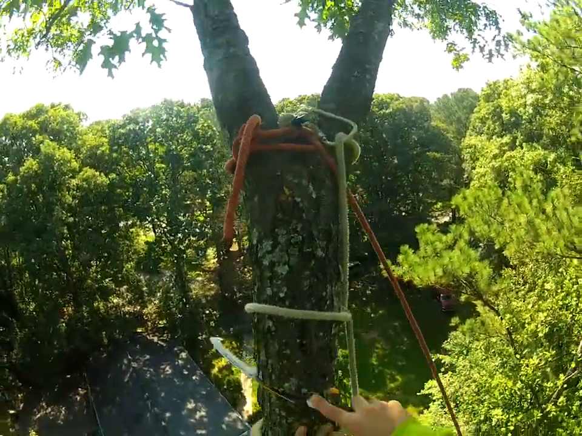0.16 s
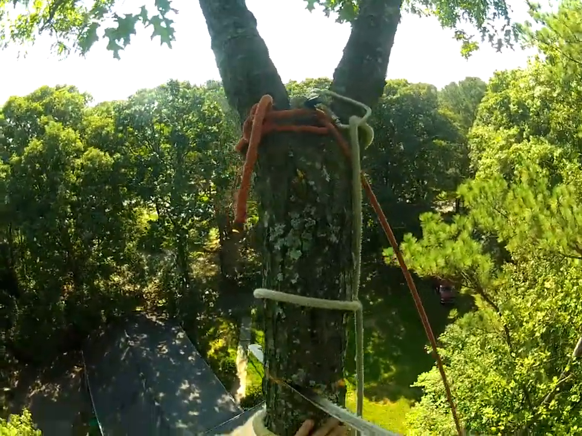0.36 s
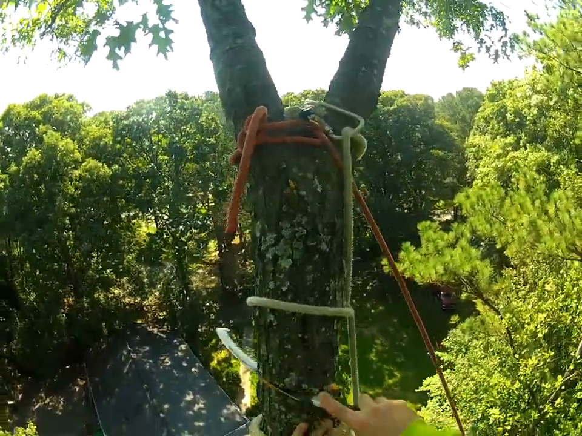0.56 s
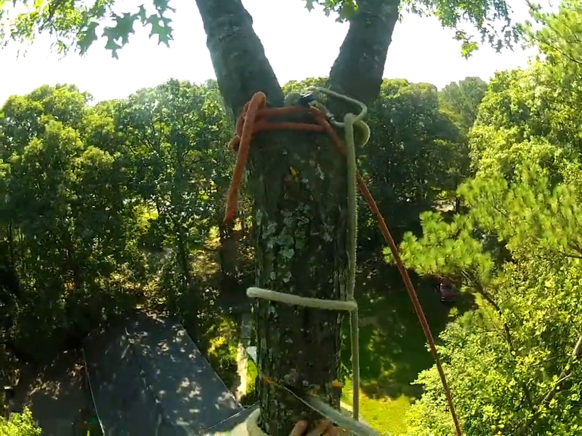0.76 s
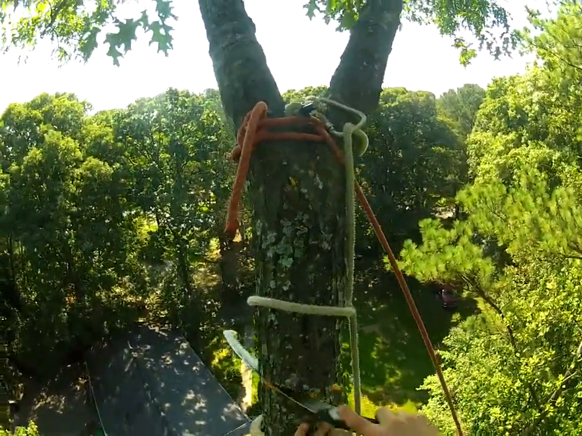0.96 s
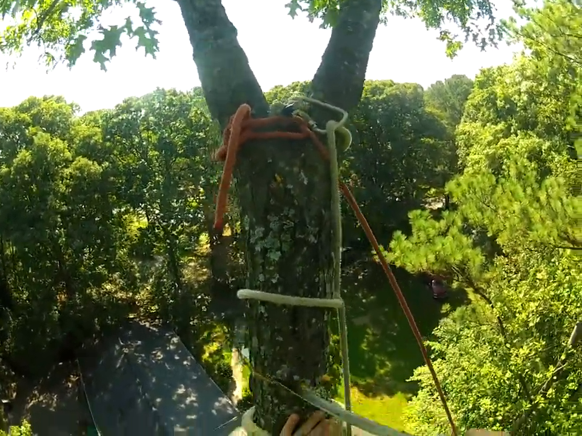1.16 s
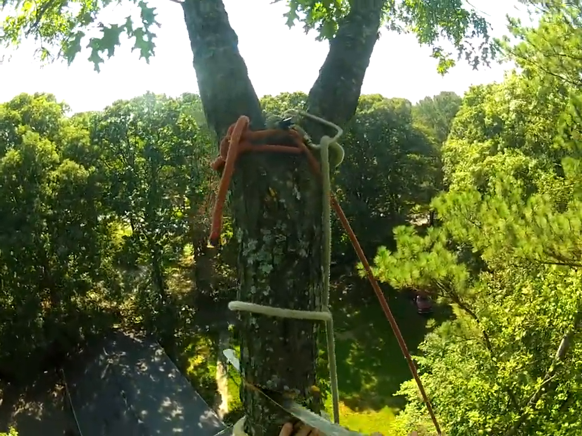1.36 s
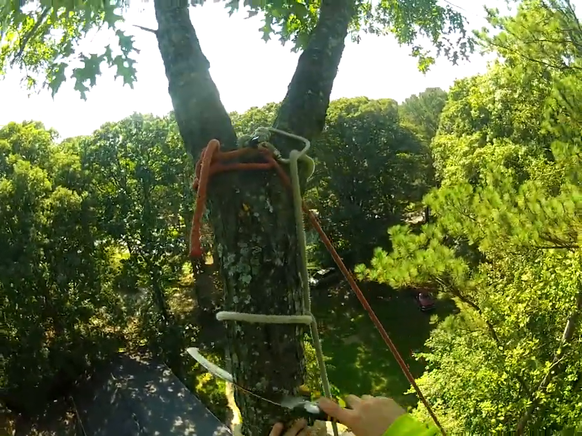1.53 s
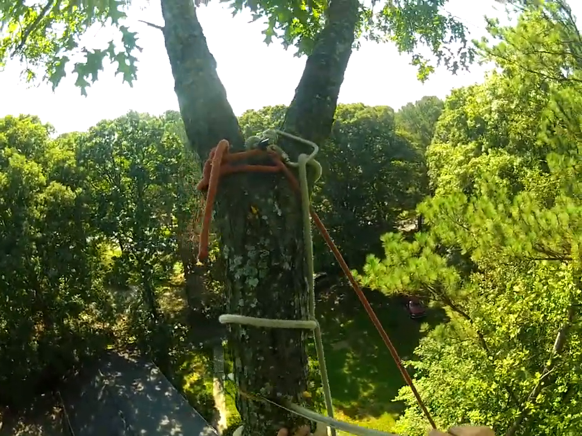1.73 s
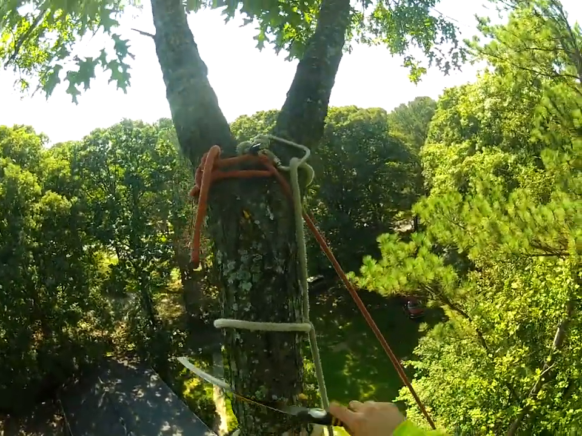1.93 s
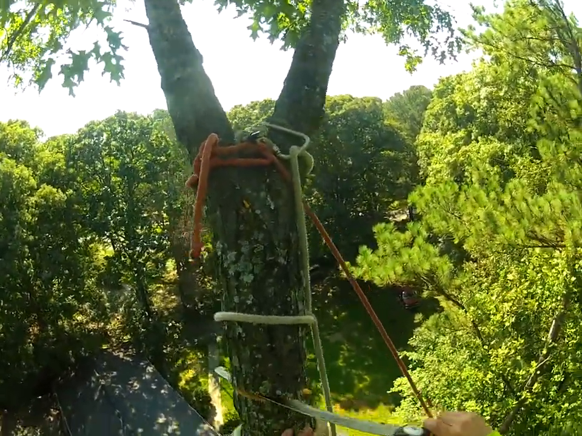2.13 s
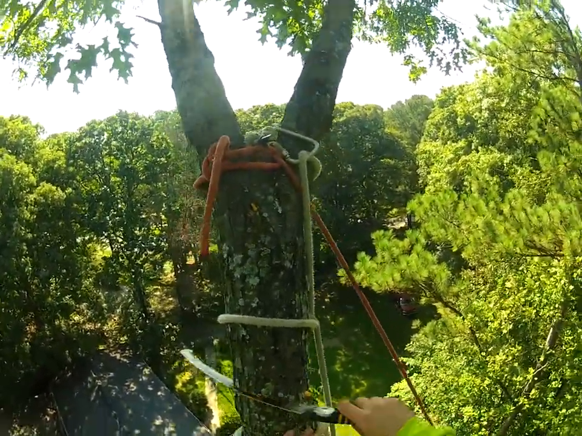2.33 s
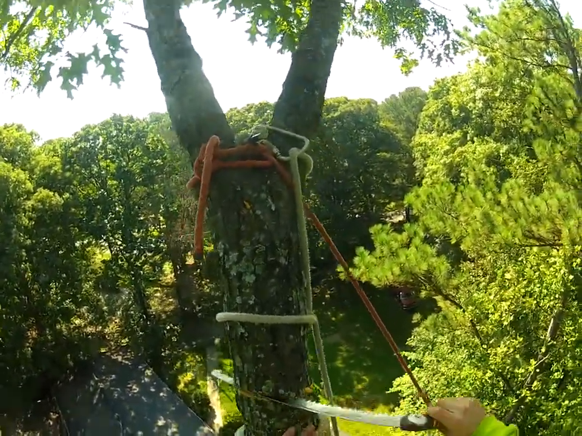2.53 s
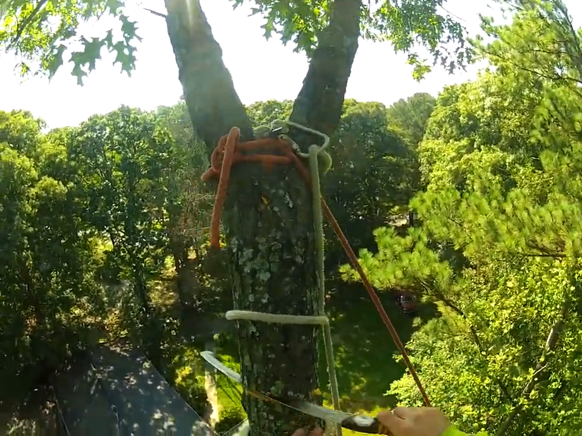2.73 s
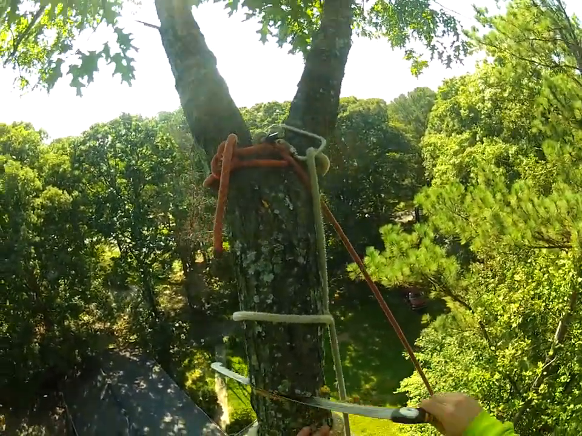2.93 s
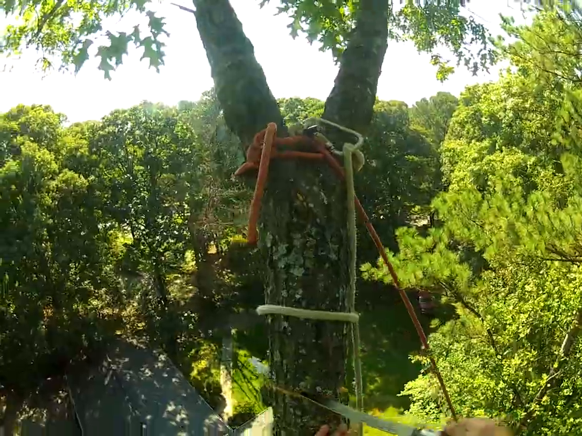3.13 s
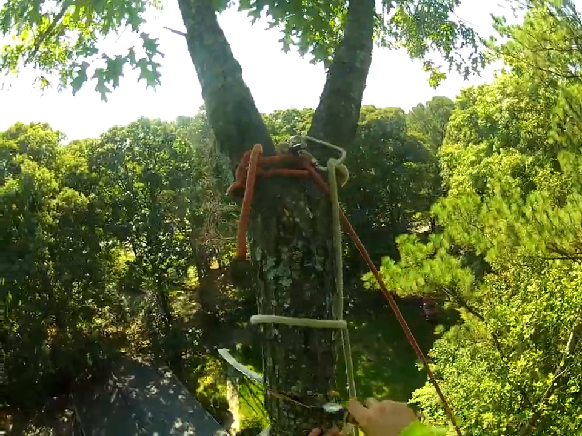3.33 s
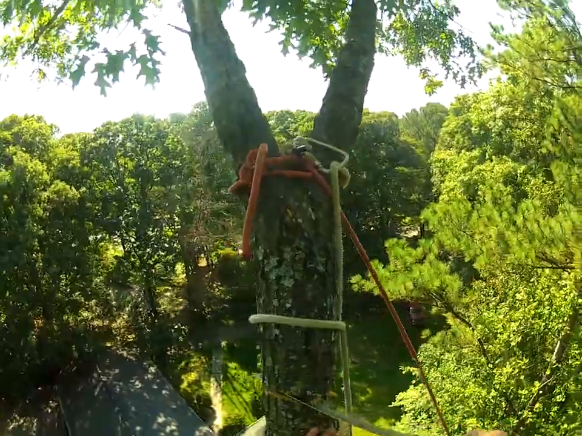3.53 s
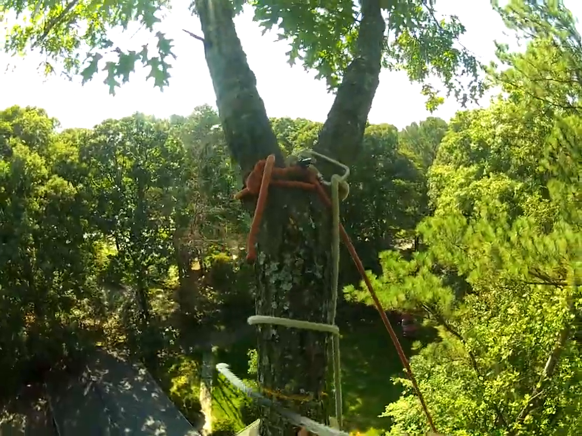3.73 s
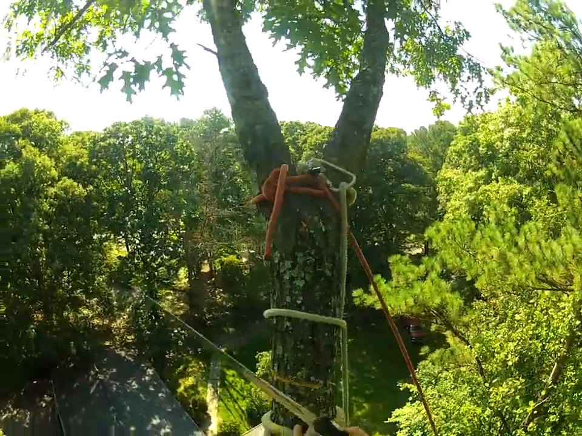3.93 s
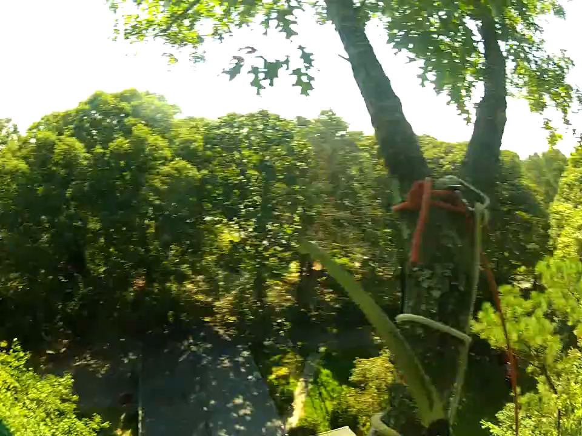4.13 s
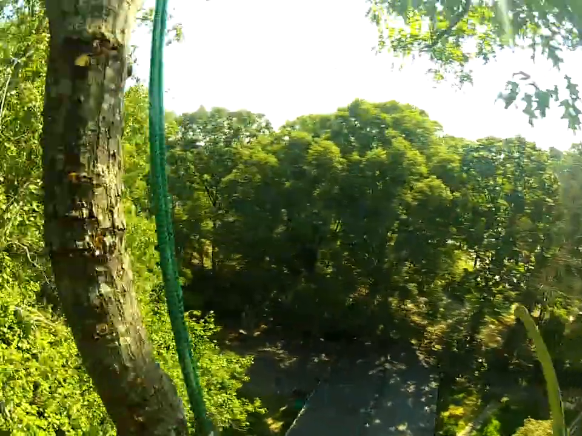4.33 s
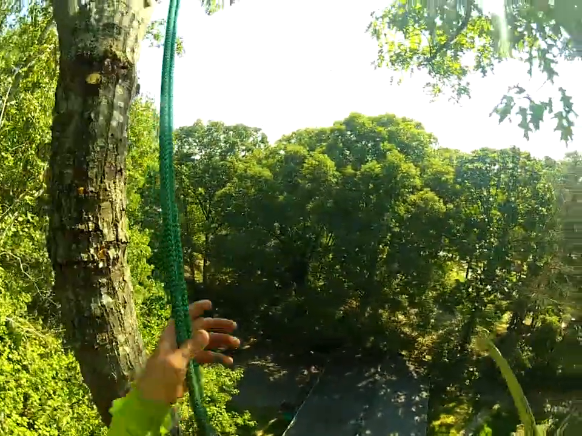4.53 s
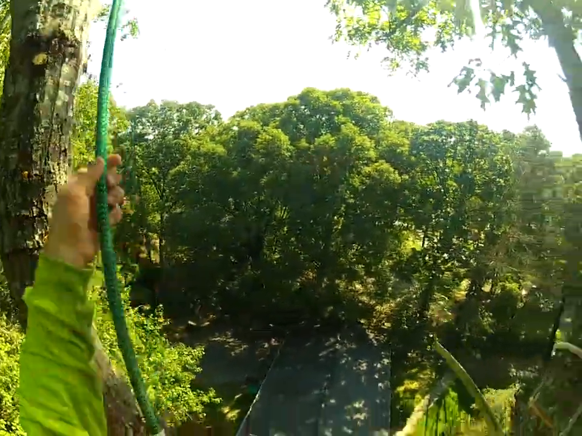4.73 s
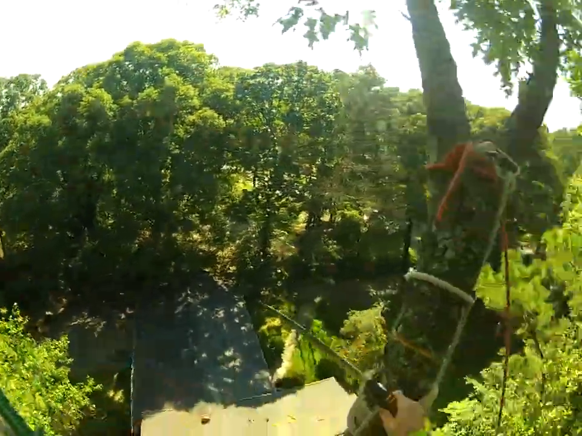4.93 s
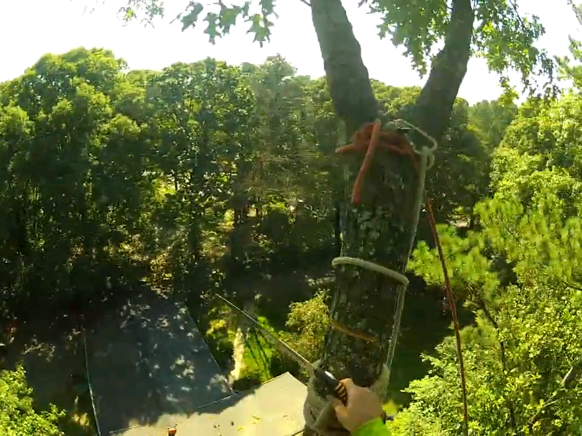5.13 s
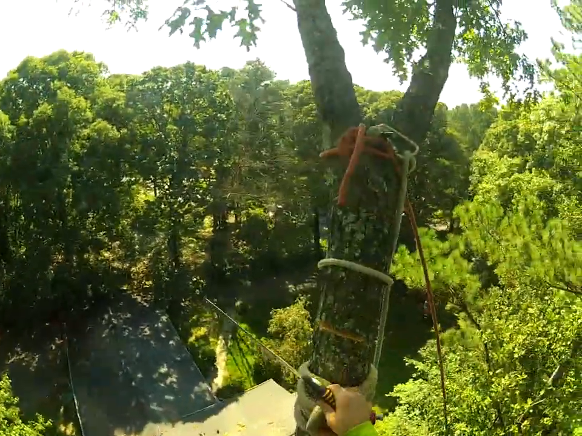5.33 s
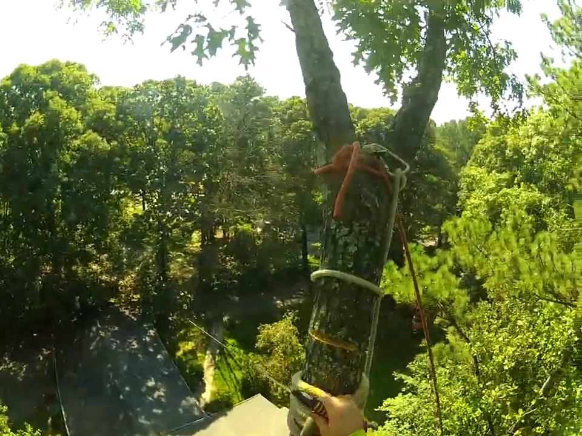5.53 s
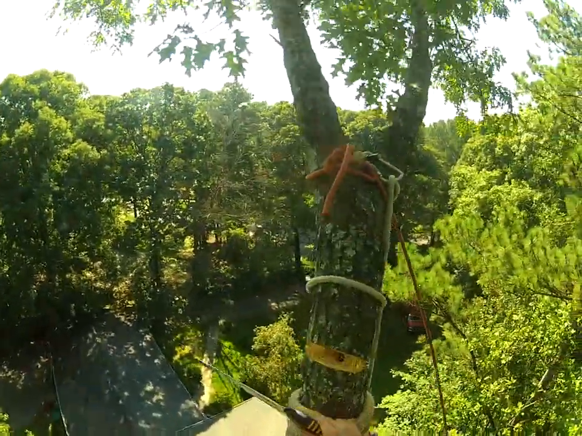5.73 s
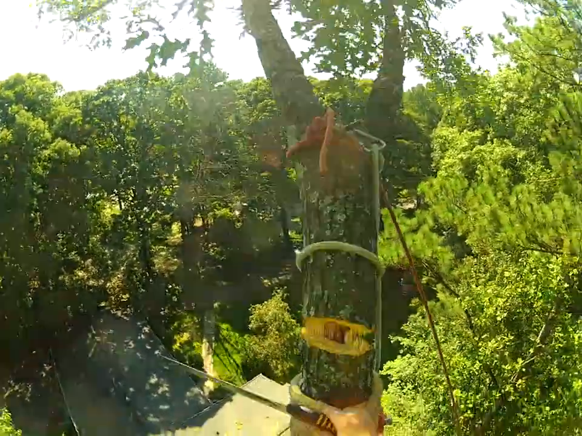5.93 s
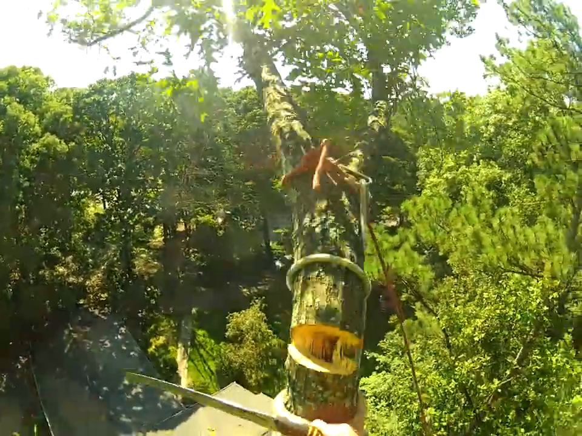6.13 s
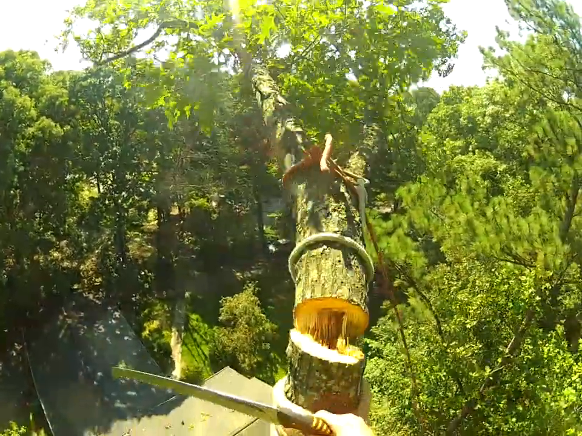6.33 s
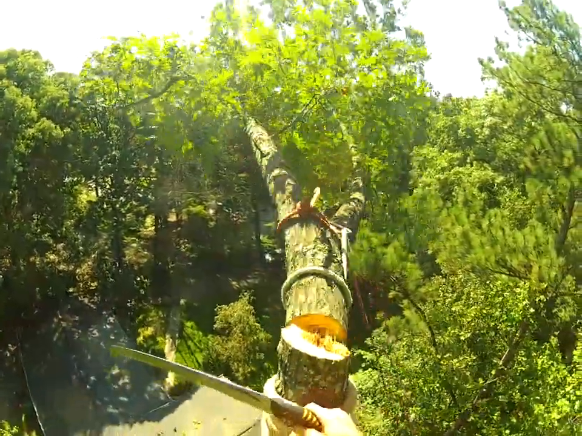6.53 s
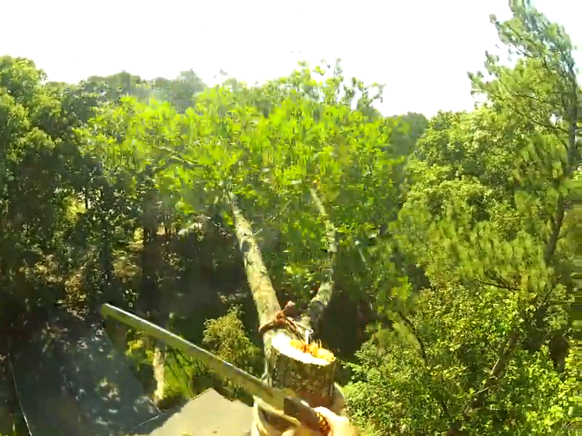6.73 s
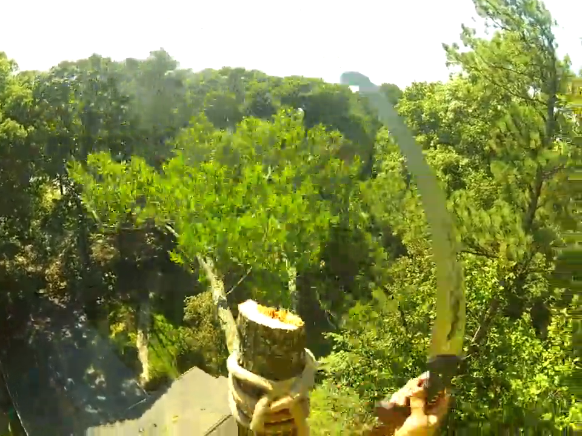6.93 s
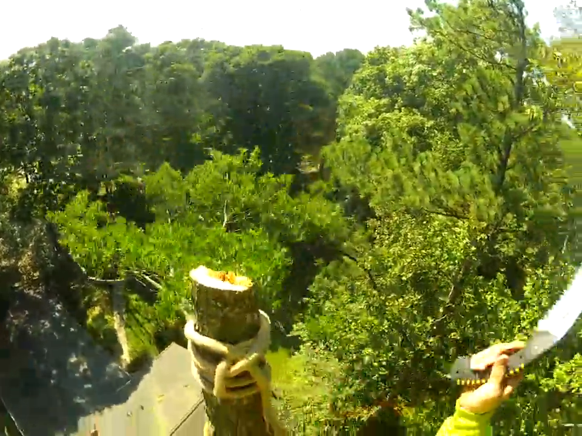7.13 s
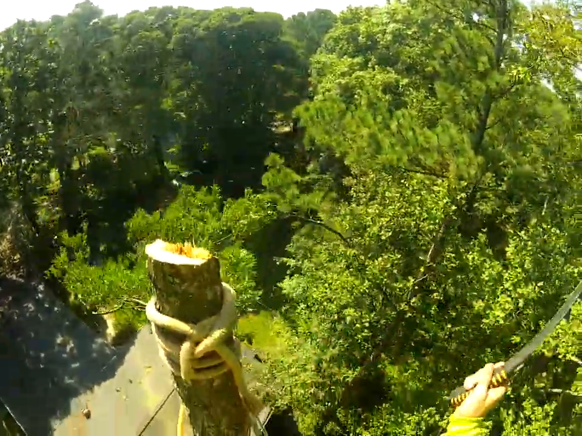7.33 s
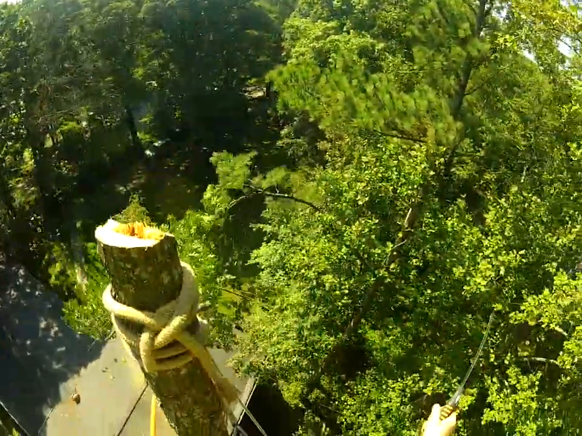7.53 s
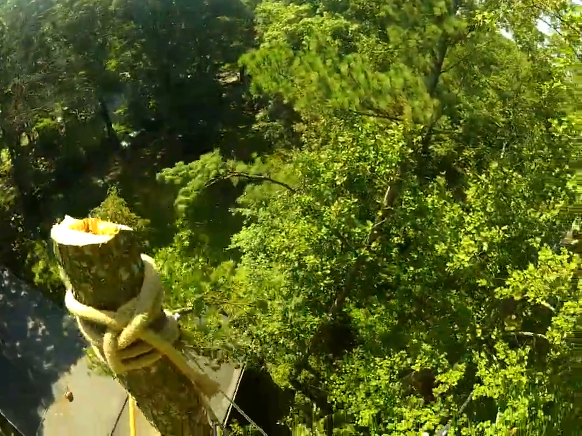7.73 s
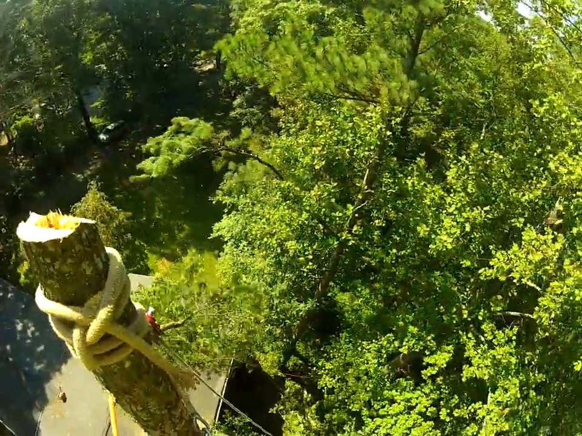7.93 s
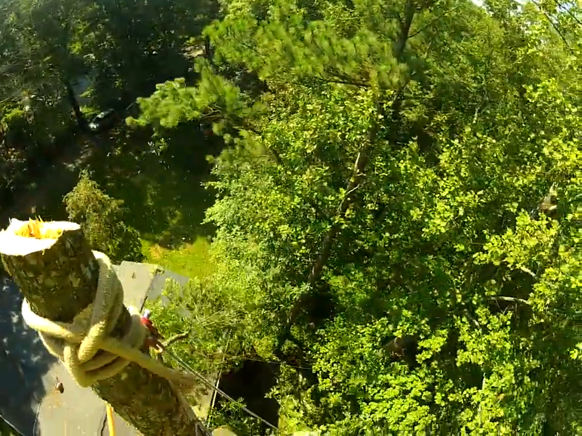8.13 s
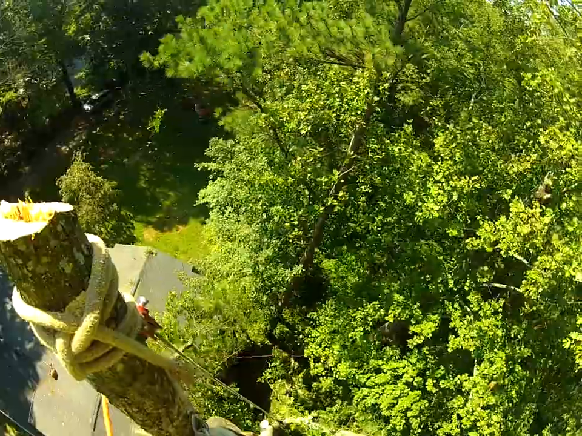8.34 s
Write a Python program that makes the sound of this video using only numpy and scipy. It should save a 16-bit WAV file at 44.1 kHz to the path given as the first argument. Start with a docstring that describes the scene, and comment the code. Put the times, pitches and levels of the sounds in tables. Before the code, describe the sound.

Outdoors high in a tree, a boxy, muffled helmet microphone in a sealed plastic case. Quick back-and-forth hand saw strokes rasp faintly under loud hollow clacks, pad thuds and small rattles as each stroke jolts the case. The knocking thins and stops, wood ticks and snaps sparsely, then cracks crowd into a loud splintering tear. The top falls with a grainy, flickering rustle of leaves and a few last snaps, then a low steady murmur.

```python
"""High in a tree a climber saws through a stem, heard by a helmet camera in a sealed plastic case.
Strokes jolt the camera against the stops of its mount: struck shell modes, pad thuds, damped nods.
The muffled saw is tooth clicks and noise through the resonances of the case, over a steady floor.
The hinge cracks and tears as noise bursts; the top falls, its leaves a grainy, flickering rush."""
import sys
import numpy as np
from scipy import signal
from scipy.fft import rfft, irfft
from scipy.io import wavfile
from scipy.ndimage import uniform_filter1d

SR = 44100
rng = np.random.default_rng(int(sys.argv[2]) if len(sys.argv) > 2 else 0)


def to_wav(s):
    """Save 16-bit WAV."""
    ch = np.atleast_2d(s).T  # columns
    pcm = np.round(np.clip(ch, -1, 1) * 32767)  # PCM
    wavfile.write(sys.argv[1], SR, pcm.astype(np.int16))


N = 373527
STEP = 32   # samples between control points


def amp(db):
    """dB to gain."""
    return 10 ** (np.asarray(db) / 20)


def rms_one(x):
    """Scale to rms 1."""
    return x / np.sqrt(np.mean(x ** 2) + 1e-20)


def control_times():
    """Times of the control points, in seconds."""
    return np.arange(0, N, STEP) / SR


def per_sample(control):
    """Hold each control point for STEP samples."""
    return np.repeat(control, STEP)[:N]


def in_time(rows):
    """Level and any tilt curve at the control points; -150 dB outside the table."""
    time_s, level_db, *others = np.transpose(rows)
    t = control_times()
    level = np.interp(t, time_s, level_db, left=-150, right=-150)
    return [level] + [np.interp(t, time_s, column) for column in others]


def tilted(level_db, tilt_db_per_octave, hz):
    """Gain at hz for a slope that turns about 1.5 kHz."""
    return amp(level_db + tilt_db_per_octave * np.log2(hz / 1500))


def flicker(rate_hz):
    """Slow random curve at the control points: twice-smoothed noise, rms 1."""
    r = np.exp(-2 * np.pi * rate_hz * STEP / SR)
    return rms_one(signal.lfilter([1], [1, -2 * r, r * r], rng.standard_normal(N // STEP + 1)))


def grains(per_s, spread_db):
    """Random clicks of uneven size and sign; rms 1."""
    signs = rng.choice([-1, 1], N)
    sizes = amp(spread_db * np.minimum(rng.exponential(1, N), 4))
    return rms_one(signs * sizes * (rng.random(N) < per_s / SR))


def ring(drive, hz, t60_s):
    """Damped resonance: a unit click sets off a dying sine."""
    r = amp(-60 / (t60_s * SR))
    w = 2 * np.pi * hz / SR
    return signal.lfilter([0, np.sin(w)], [1, -2 * r * np.cos(w), r * r], drive + 1e-18)


def bursts(rows, gains, shapes):
    """Lay each event's burst at its time (first column) with its gain."""
    out = np.zeros(N + shapes.shape[1])
    for row, gain, shape in zip(rows, gains, shapes):
        at = round(row[0] * SR)
        out[at:at + len(shape)] += gain * shape
    return out[:N]


# far outdoor murmur and circuit noise, spectrum shape: freq_hz [Hz], density_db [dB per Hz, relative]
FLOOR_SPECTRUM = [(12, -18.5), (20, -4.5), (234, -3), (771, -18), (955, -15.5), (1080, -16.5), (1610, -29),
                  (3230, -18.5), (4190, -24), (5450, -22), (6000, -30), (7800, -18.5), (13200, -120)]
FLOOR_RMS_DB = -58.5


def floor():
    """Steady noise coloured in the frequency domain."""
    hz = np.maximum(np.fft.rfftfreq(N, 1 / SR), 1)
    freq_hz, density_db = np.transpose(FLOOR_SPECTRUM)
    colour = amp(np.interp(np.log(hz), np.log(freq_hz), density_db))
    return amp(FLOOR_RMS_DB) * rms_one(irfft(rfft(rng.standard_normal(N)) * colour, N))


# resonances of the case that let airborne sound in: freq_hz [Hz], width_hz [Hz], gain_db [dB]
CASE_LEAKS = [(380, 93, -8), (964, 61, 1), (1192, 73, -5), (1653, 240, -2.5), (2058, 109, 0.5),
              (2366, 196, -1.5), (2858, 253, 0.5), (3110, 580, -6), (3827, 330, -6.5), (4486, 154, -10),
              (5000, 590, -10.5), (5810, 1500, -17)]


def through_case(drive_at):
    """Sum of resonant leaks, alternating in sign; drive_at(hz) gives the sound that reaches each."""
    out = np.zeros(N)
    for k, (freq_hz, width_hz, gain_db) in enumerate(CASE_LEAKS):
        r = np.exp(-np.pi * width_hz / SR)
        b = (-1) ** k * amp(gain_db) * (1 - r * r) / 2 * np.array([1, 0, -1])
        a = [1, -2 * r * np.cos(2 * np.pi * freq_hz / SR), r * r]
        out += signal.lfilter(b, a, drive_at(freq_hz) + 1e-18)
    return out


def rush(curve, source, offset_db, patchy_db):
    """A source on a level and tilt curve, flickering band by band."""
    level_db, tilt_db = in_time(curve)

    def at(hz):
        band_db = level_db + offset_db + patchy_db * flicker(41)
        return per_sample(tilted(band_db, tilt_db, hz)) * source
    return at


def rustle():
    """Leaf contacts as dense clicks, blended with noise."""
    return grains(4000, 1.3) + 0.78 * rng.standard_normal(N)


# crown leaves while the stem stands: time_s [s], level_db [dB, relative], tilt [dB/octave]
CROWN_TREMBLE = [(0.0, -50, -9.5), (0.2, -56.5, -8), (1.3, -62.5, -1.5), (2.6, -64, 1), (3.85, -68, 3),
                 (4.44, -72.5, 6.5), (5.3, -69, 1.3)]


def trembling_leaves(leaf_noise):
    """Leaves of the standing crown brush together: rustle with slight flicker."""
    return rush(CROWN_TREMBLE, leaf_noise, 7.1, patchy_db=1.0)


# leaves of the falling top: time_s [s], level_db [dB, relative], tilt [dB/octave]
FALLING_LEAVES = [(5.85, -48, -0.8), (6.2, -54, 2.5), (6.55, -61.5, 4), (6.62, -51.5, 5), (6.7, -55.5, 3.5),
                  (6.74, -58.5, 1.5), (6.9, -53, 2), (7.29, -52, 3.5), (7.75, -51, 4), (7.94, -60.5, 5.5),
                  (8.47, -57.5, -1.7)]


def falling_leaves(leaf_noise):
    """Leaves rush through the air with the falling top: rustle with stronger flicker."""
    return rush(FALLING_LEAVES, leaf_noise, 7.0, patchy_db=2.0)


# dense tearing of the hinge: time_s [s], level_db [dB, relative], tilt [dB/octave]
HINGE_TEARING = [(5.25, -59, 3), (5.358, -65, -6), (5.54, -43.5, 2), (5.618, -41, -1), (5.704, -36.5, -1.5),
                 (5.824, -36, -2), (5.95, -66, -7)]


def tearing():
    """Many fibres part close together: sparse clicks in noise, very patchy."""
    fibres = grains(600, 0.99) + 0.6 * rng.standard_normal(N)
    return rush(HINGE_TEARING, fibres, 5.7, patchy_db=3.5)


# snap rate as the hinge takes strain: time_s [s], rate [snaps per s]
HINGE_STRAIN = [(4.0, 2.5), (4.8, 7), (5.25, 14), (5.5, 30), (5.85, 30), (6.0, 12), (6.7, 6), (6.75, 0.1)]
SNAP_BASE_DB, SNAP_SPREAD_DB = -56, 2.5
SNAP_TILT_DB_PER_OCTAVE = 1


def small_snaps():
    """Rows like those of the loud cracks, drawn at random at the rate that the strain sets."""
    slot_s = .002
    t = np.arange(HINGE_STRAIN[0][0], HINGE_STRAIN[-1][0], slot_s)
    chance, size, pitch = rng.random((len(t), 3)).T
    born = chance < np.interp(t, *np.transpose(HINGE_STRAIN)) * slot_s
    level_db = SNAP_BASE_DB - SNAP_SPREAD_DB * np.log(size + 0.013)   # few are loud
    tilt_db = np.full(len(t), SNAP_TILT_DB_PER_OCTAVE)
    return np.transpose([t, level_db, tilt_db, 1900 + 1100 * pitch])[born]


# loudest fibres and twigs: start_s [s], peak_db [dB, relative], tilt [dB/octave], pitch_hz [Hz]
LOUD_CRACKS = [(3.9938, -53, 4, 2900), (4.2009, -45, 3, 2340), (4.3094, -50, -1, 2820),
               (4.4064, -40.5, 4, 2630), (4.6793, -43, 10.5, 2320), (4.714, -32.5, 7.5, 2290),
               (4.807, -37.5, 4, 3840), (4.9197, -51, 9.5, 3270), (5.0729, -42, 3.5, 2090),
               (5.148, -43, 3, 2940), (5.2101, -42.5, 1, 2870), (5.3009, -33.5, 2.5, 2830),
               (5.3176, -34.5, 4.5, 2410), (5.3538, -38, 6.5, 2870), (5.3662, -31, 4.5, 2800),
               (5.3889, -32.5, 7, 2830), (5.3964, -33, 0.5, 2840), (5.4177, -26, 5, 2600),
               (5.4573, -48, 9.5, 2860), (5.5074, -34, 9.5, 2620), (5.5349, -31.5, 3, 2600),
               (5.5436, -29.5, 3, 2880), (5.5718, -25.5, 4.5, 2940), (5.5804, -24.5, -1, 2530),
               (5.6012, -29.5, 6.5, 2870), (5.6268, -40, 12, 3300), (5.6481, -36, 5, 2600),
               (5.666, -29.5, 8.5, 2800), (5.6844, -31, 4, 2410), (5.7137, -17.5, 2, 2940),
               (5.7283, -12, -0.5, 2130), (5.7364, -23, -3.5, 2380), (5.7592, -17.5, 1, 1600),
               (5.7803, -18, 0, 2630), (5.8044, -22.5, -2.5, 2360), (5.8227, -22, 1, 2810),
               (5.8374, -23.5, 0.5, 2820), (5.8934, -44, -5, 1950), (6.0077, -41, 5, 2020),
               (6.0407, -37, 1.5, 2850), (6.0534, -40, 2, 2380), (6.1174, -40, 1.5, 2820),
               (6.2248, -38.5, -.5, 2870), (6.4572, -42, 2.5, 2950), (6.477, -37, 1.5, 2030),
               (6.5894, -45, 1.5, 2450), (6.6174, -35, 3, 1990), (6.6244, -34, 0.5, 2400),
               (6.6558, -37, 1, 2870), (6.6932, -39, 2, 2850)]
CRACK_LIFT_DB = 5.0   # at a crack's own pitch
SPLINTER_T60_S, SPLINTER_MORE_S = 0.043, 0.097   # faint crack; added at full scale


def cracks():
    """A fibre snaps at once, then splinters on as dying noise, strongest near its own pitch."""
    t = np.arange(4000) / SR
    rows = np.vstack([LOUD_CRACKS, small_snaps()])
    start_s, peak_db, tilt_db, pitch_hz = rows.T
    t60_s = np.clip(SPLINTER_T60_S + SPLINTER_MORE_S * amp(peak_db), .005, 1)
    snap = 1.12 * np.exp(-t / 0.000083)
    envelope = amp(-60 * t / t60_s[:, None]) + snap
    splinter = rng.standard_normal((len(rows), len(t))) * envelope

    def at(hz):
        nearness = np.exp(-(np.log2(hz / pitch_hz) / 0.18) ** 2)
        level_db = peak_db + 3.5 + CRACK_LIFT_DB * nearness
        return bursts(rows, tilted(level_db, tilt_db, hz), splinter)
    return at


# saw strokes, pull and push in turn:
# start_s [s], end_s [s], rasp_db [dB, relative], shake_db [dB, relative; shaking of the mount]
SAW_STROKES = [(-.05, 0.088, -48.5, -37.5), (0.17, 0.327, -54, -52), (.34, 0.509, -52, -37),
               (0.554, 0.752, -60.5, -46), (0.759, 0.912, -49.5, -37.5), (1, 1.16, -56.5, -50),
               (1.182, 1.324, -48.5, -40.5), (1.467, 1.627, -60.5, -58), (1.636, 1.812, -54, -33.5),
               (1.948, 2.11, -60.5, -58.5), (2.12, 2.268, -54.5, -45.5), (2.354, 2.522, -59.5, -51),
               (2.533, 2.7, -50.5, -44.5), (2.80, 2.968, -66.5, -55.5), (2.967, 3.147, -54.5, -43.5),
               (3.257, 3.46, -68, -57.5), (3.495, 3.663, -56.5, -40), (3.72, 3.87, -74, -58)]
PULL_ATTACK_S, PUSH_ATTACK_S, STOP_S = 0.04, 0.087, 0.044


def blade_speeds():
    """Speed 0-1 of every stroke: speeding up (a pull sooner), full speed, stop."""
    t = control_times()
    speeds = []
    for k, (start_s, end_s, *_) in enumerate(SAW_STROKES):
        attack_s = (PULL_ATTACK_S, PUSH_ATTACK_S)[k % 2]
        corners = np.sort([start_s, start_s + attack_s, end_s - STOP_S, end_s])
        speeds.append(np.interp(t, corners, [0, 1, 1, 0]))
    return np.array(speeds)


TEETH_PER_S = 1000   # clicks at full speed
RASP_TILT_DB_PER_OCTAVE = 3   # at a rasp of -56 dB
DULLING = 0.23   # slope lost per dB more of bite


def saw():
    """Teeth tear fibres more often and louder with blade speed; each band catches and slips alone."""
    speeds = blade_speeds()
    speed = speeds.max(axis=0)
    rasp_db = np.array(SAW_STROKES)[speeds.argmax(axis=0), 2]   # of the fastest stroke
    tilt_db = RASP_TILT_DB_PER_OCTAVE - DULLING * (rasp_db + 56)
    teeth = grains(TEETH_PER_S * per_sample(speed), 0.84) + 2.26 * rng.standard_normal(N)

    def at(hz):
        level_db = rasp_db + 2.5 + 2.9 * flicker(25)
        return per_sample(tilted(level_db, tilt_db, hz) * speed ** 0.55) * teeth
    return at


# mount swaying with body and wind: time_s [s], level_db [dB, relative]
MOUNT_SWAY = [(0, -62), (3.9, -60), (4.1, -64.5), (4.43, -51), (4.6, -59.5), (5.57, -64.5), (5.78, -42.5),
              (5.9, -48.5), (6.01, -56), (6.39, -63), (6.65, -52), (6.8, -59), (8.47, -57.5)]
SWING_HZ, SWING_T60_S = 49.8, 0.089   # case nodding on the helmet mount
SHAKE_LINGER_DB_PER_S = 128   # decay after a stroke


def shake():
    """Low random pushes keep the mount nodding, hardest during and just after each stroke."""
    push = rng.standard_normal(N)
    lumps = signal.sosfilt(signal.butter(2, [25, 120], "band", fs=SR, output="sos"), push)
    t = control_times()
    start_s, end_s, _, shake_db = np.transpose(SAW_STROKES)[:, :, None]
    rising = np.clip((t - start_s) / PULL_ATTACK_S, 0, 1)
    lingering_db = shake_db - SHAKE_LINGER_DB_PER_S * np.maximum(t - end_s, 0)
    strokes = np.max(rising * amp(lingering_db), axis=0)
    sway = amp(in_time(MOUNT_SWAY)[0])
    gain = uniform_filter1d(per_sample(strokes + sway), size=STEP)
    nodding = rms_one(ring(push, SWING_HZ, SWING_T60_S))
    return gain * rms_one(rms_one(lumps) + 4.0 * nodding)


# modes of the struck plastic case: freq_hz [Hz], level_db [dB, relative], t60_s [s]
SHELL_MODES = [(707, -34.5, 0.064), (784, -22.5, 0.02), (944, -13.5, 0.02), (1120, -19, 0.015),
               (1232, -22.5, 0.016), (1530, -24.5, 0.019), (1675, -21, 0.016), (1899, -20, 0.014),
               (1950, -17.5, 0.0097), (2185, -17, .015), (2315, -37, 0.049), (2830, -44, 0.057),
               (3120, -50, 0.084), (3330, -41, 0.06), (4160, -68, 0.011)]
FIRST_TOUCH = 0.97   # first click against the chatter after it


def shell(rows, lengths_s, gain_at):
    """Each contact is a short chatter into every mode, weighted by gain_at(hz); blunt, so no treble."""
    t = np.arange(1500) / SR
    decay = np.exp(-t / np.clip(lengths_s, 1e-4, 1)[:, None])
    build_up = 1 - np.exp(-t / np.clip(0.37 * lengths_s, 2e-5, 1)[:, None])
    chatter = rng.standard_normal((len(rows), len(t))) * decay * build_up
    chatter[:, 12] += FIRST_TOUCH * np.sqrt(np.sum(chatter ** 2, axis=1))
    chatter /= np.sqrt(np.sum(chatter ** 2, axis=1, keepdims=True))   # unit energy
    rung = np.zeros(N)
    for freq_hz, level_db, t60_s in SHELL_MODES:
        contacts = bursts(rows, gain_at(freq_hz), chatter)
        rung += ring(amp(level_db) * contacts, freq_hz, t60_s)
    return signal.sosfilt(signal.butter(6, [520, 3500], "band", fs=SR, output="sos"), rung)


# loose part in the case: start_s [s], level_db [dB, relative], pitch_hz [Hz], length_s [s]
LOOSE_RATTLES = [(0.022, -19, 1900, 0.0029), (0.113, -37, 918, 0.012), (0.14, -19, 1350, 0.0039),
                 (.319, -38, 1940, 0.0029), (0.401, -32, 904, 0.0032), (0.44, -21.5, 1240, 0.0054),
                 (.588, -25.5, 1130, 0.0054), (0.597, -24.5, 1400, 0.0081), (0.826, -36, 964, .01),
                 (0.841, -28, 990, 0.0075), (0.952, -32, 1000, 0.0043), (1.001, -31, 1010, 0.0023),
                 (1.264, -30, 910, 0.0056), (1.696, -18.5, 1630, 0.0048), (1.724, -33.5, 1080, 0.004),
                 (2.11, -42, 2070, 0.0024), (2.125, -34, 930, 0.0037), (2.212, -32, 929, 0.0094),
                 (2.529, -35, 1900, .007), (2.686, -47, 2880, .006), (3.04, -20.5, 1800, .004),
                 (3.062, -30.5, 1180, 0.011), (3.326, -31, 3350, 0.0024), (3.567, -29, 1630, 0.0082),
                 (4.267, -36, 1000, 0.0023), (4.995, -42, 950, 0.0016), (6.339, -45, 900, 0.0045),
                 (7.479, -37, 930, 0.0043), (7.548, -40, 930, 0.0037)]


def rattles():
    """A light touch favours the modes near its own pitch; a small hard part partly evens them out."""
    start_s, level_db, pitch_hz, length_s = np.transpose(LOOSE_RATTLES)
    modes_hz, modes_db, _ = np.transpose(SHELL_MODES)

    def gain_at(hz):
        off_pitch_db = 28.4 * np.log2(hz / pitch_hz) ** 2
        evening_db = 0.25 * np.interp(hz, modes_hz, modes_db)
        return amp(level_db + 8.0 - off_pitch_db - evening_db)
    rung = shell(LOOSE_RATTLES, length_s, gain_at)
    # too light to move the low modes
    return signal.sosfilt(signal.butter(4, 800, "high", fs=SR, output="sos"), rung)


# camera thrown against a stop of its mount: start_s [s], stop [-1 back, 1 front],
# clack_db [dB, relative], clack_tilt [dB/octave], thud_db [dB], thud_hz [Hz], swing_db [dB]
MOUNT_KNOCKS = [(.017, -1, -27.5, -7, -19, 162, -28), (.052, -1, -7, -12, -7.5, 205, -8.5),
                (.33, 1, -33, 1, -25.5, 240, -30), (.343, 1, -8.5, 3, -13.5, 211, -12),
                (0.462, -1, -6, -3, -9.5, 195, -8.5), (.489, -1, -31, -15, -32, 284, -21),
                (.738, 1, -32, -10, -50, 157, -32), (.749, 1, -7.5, -2.5, -12, 222, -12),
                (.872, -1, -8, -10, -9, 194, -9), (1.159, -1, -19.5, -13, -13.5, 195, -47),
                (1.17, 1, -10.5, -4, -48, 223, -10), (1.204, -1, -43, -3, -34, 172, -31),
                (1.219, 1, -25, 7, -33, 245, -26), (1.238, -1, -32, -1.5, -30, 160, -20.5),
                (1.285, -1, -9, -11, -9.5, 193, -10), (1.652, -1, -11.5, -4.5, -12.5, 145, -19.5),
                (1.661, 1, -8, -4, -32, 163, -11), (1.763, 1, -47, 1.5, -24, 197, -29),
                (1.776, -1, -7, -3, -7.5, 223, -10.5), (2.129, -1, -16.5, -10.5, -25.5, 232, -17),
                (2.143, 1, -10.5, 1.5, -48, 164, -10), (2.175, 1, -38, -1, -24, 227, -35),
                (2.184, -1, -24.5, 4, -29, 161, -24.5), (2.242, -1, -13, -6, -14, 186, -12.5),
                (2.355, 1, -45.5, -2.5, -46, 164, -30.5), (2.55, 1, -33.5, -21, -31, 110, -16),
                (2.563, 1, -13.5, 2.5, -17, 144, -17), (2.576, 1, -24.5, -9, -40, 110, -14.5),
                (2.741, -1, -16, -14, -15, 163, -32), (2.75, -1, -10, -9, -9.5, 242, -15),
                (3.001, 1, -24, -3, -23, 170, -22), (3.027, -1, -44, 14, -27, 170, -39),
                (3.175, -1, -9, -7, -11.5, 235, -8), (3.475, 1, -49, 1, -36, 137, -29),
                (3.687, -1, -16, -9, -16, 240, -15), (3.73, 1, -46.5, -16, -31, 240, -25),
                (3.802, 1, -61, 0, -44, 129, -39)]
THUD_T60_S = 0.039   # camera body on its pad
KNOCK_SWING_HZ = 59.2   # nod just after a knock


def knocks():
    """Clack of the shell, thud on the pad and a nod of the mount that starts at full swing."""
    t = np.arange(SR // 4) / SR
    body = np.zeros(N)
    for start_s, stop, _, _, thud_db, thud_hz, swing_db in MOUNT_KNOCKS:
        thud = amp(thud_db - 60 * t / THUD_T60_S) * np.sin(2 * np.pi * thud_hz * t)
        swing = amp(swing_db - 60 * t / SWING_T60_S) * np.cos(2 * np.pi * KNOCK_SWING_HZ * t)
        at = round(start_s * SR)
        body[at:at + len(t)] += np.sign(stop) * (thud + swing)
    # the stop gives a little
    soft = signal.sosfilt(signal.butter(4, 410, fs=SR, output="sos"), body)
    _, _, clack_db, tilt_db, *_ = np.transpose(MOUNT_KNOCKS)
    lengths_s = np.full(len(MOUNT_KNOCKS), .0018)
    clack = shell(MOUNT_KNOCKS, lengths_s, lambda hz: tilted(clack_db + 5.5, tilt_db, hz))
    return soft + clack


def scene():
    """Floor, airborne leaves, wood and saw through the case, and structure-borne knocks."""
    leaf_noise = rustle()
    airborne = [trembling_leaves(leaf_noise), falling_leaves(leaf_noise), tearing(), cracks(), saw()]
    muffled = through_case(lambda hz: sum(source(hz) for source in airborne))
    camera = shake() + rattles() + knocks()
    return (floor() + muffled + camera)[None]


OVERLOAD = .62   # level at which the microphone stage flattens
TREBLE_STOP_HZ = 16450


def record(dry):
    """Rounds peaks; holds 12 kHz samples four steps of 48 kHz, mirroring about 6 kHz multiples; cuts the top."""
    rounded = OVERLOAD * np.tanh(dry / OVERLOAD)
    held = np.repeat(signal.resample_poly(rounded, 40, 147, axis=1), 4, axis=1)
    out = signal.resample_poly(held, 147, 160, axis=1)[:, :N]
    # treble falls in two steps
    out = signal.sosfilt(signal.cheby2(10, 22, 15500, fs=SR, output="sos"), out)
    return signal.sosfilt(signal.cheby2(14, 70, TREBLE_STOP_HZ, fs=SR, output="sos"), out)


dry = scene()
out = record(dry)
to_wav(out)
```